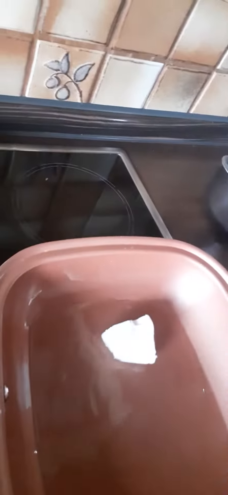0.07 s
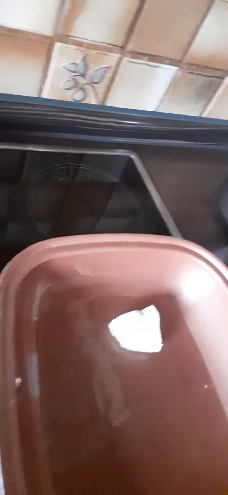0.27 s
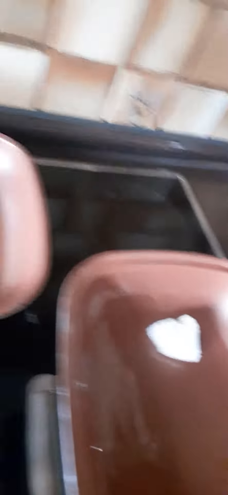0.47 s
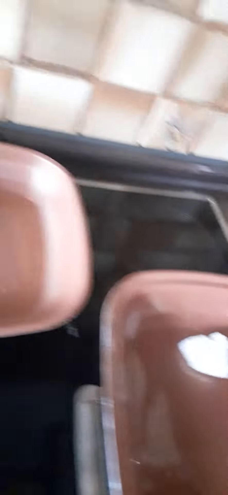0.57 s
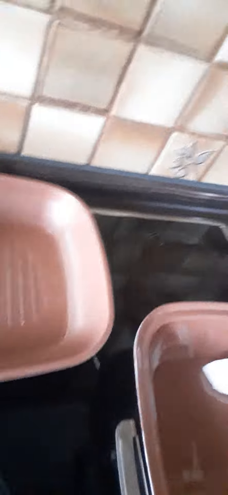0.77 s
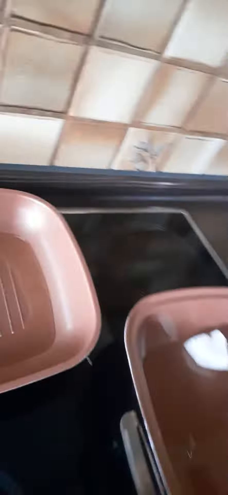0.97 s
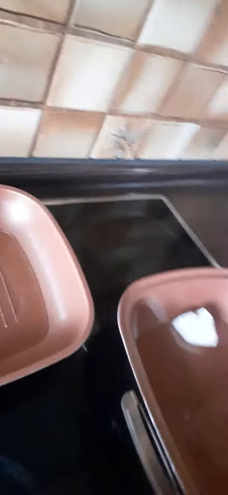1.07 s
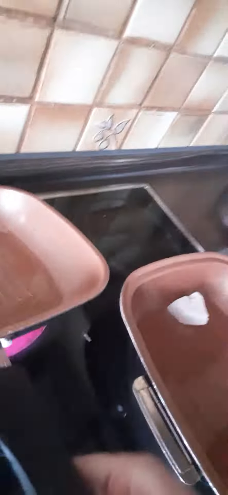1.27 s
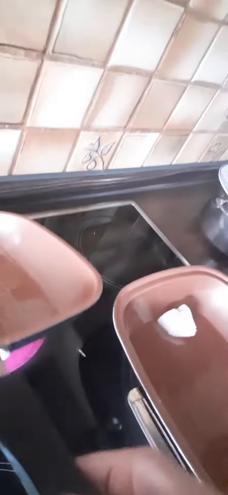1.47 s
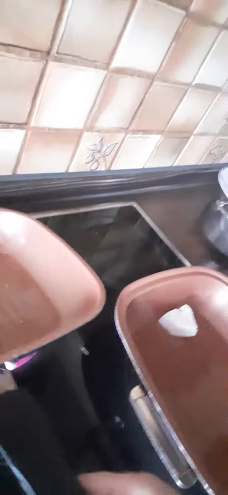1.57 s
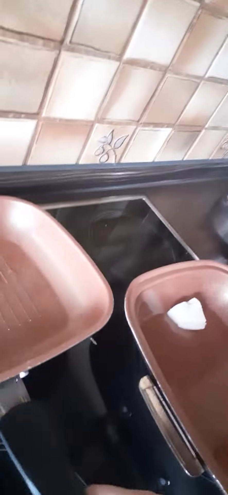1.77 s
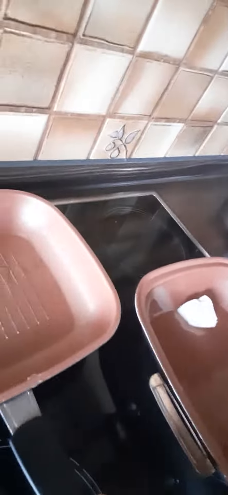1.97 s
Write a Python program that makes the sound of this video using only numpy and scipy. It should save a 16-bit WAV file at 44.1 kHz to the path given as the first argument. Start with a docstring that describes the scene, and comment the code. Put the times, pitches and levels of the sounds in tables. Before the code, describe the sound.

Loud close clank of a metal pan set on a glass hob, then softer bumps and knocks

```python
"""A metal frying pan clanks down on a glass-ceramic hob close to the microphone and rocks to rest.
A soft bump and a duller double knock follow as pans are handled, with faint scrapes, rustles and hiss between.
Each blow is a filtered contact pulse with a rattle and the answer of a small tiled kitchen; pan and hob ring
as decaying modes. Scrapes are resonant noise, rustles and hiss coloured noise, over low mains hum and room air."""
import sys
import numpy as np
from scipy import signal
from scipy.fft import rfft, irfft, next_fast_len
from scipy.io import wavfile
from scipy.ndimage import map_coordinates

SR = 44100
rng = np.random.default_rng(int(sys.argv[2]) if len(sys.argv) > 2 else 0)


def log_audio(samples):
    """Write samples as a 16-bit WAV file to the path given in sys.argv[1]."""
    # one column per channel
    frames = np.atleast_2d(samples).T
    # limit to full scale, then quantise
    limited = np.clip(frames, -1, 1)
    pcm = np.round(limited * 32767).astype(np.int16)
    wavfile.write(sys.argv[1], SR, pcm)


N = 88729  # samples, about two seconds

# How alike the two ports of the microphone hear a sound.
# Each row: frequency in Hz, left-right likeness (1 = the same, 0 = unrelated).
LIKENESS = [(60, 1), (140, .85), (300, 0.48), (560, 0.67), (1100, 0.029), (3000, 0.077), (15000, 0)]
# Colour of the fine sliding hiss and of the tick. Each row: frequency in Hz, relative level in dB.
HISS_COLOUR = [(1000, -22.5), (2500, -13), (4000, -7.5), (6000, -5.5), (9000, -3), (12500, 4),
               (15500, -2.5)]


def amp(db):
    """Decibels to gain."""
    return 10 ** (np.asarray(db) / 20)


def unit(x):
    """Scale to rms 1."""
    return x / np.sqrt(np.mean(x ** 2) + 1e-20)


def along(points, hz):
    """Read a curve of (Hz, value) points on a log frequency axis."""
    point_hz, values = np.transpose(points)
    return np.interp(np.log(hz + 1), np.log(point_hz + 1), values)


def filtered(x, response):
    """Multiply the spectrum of x by a response of frequency."""
    size = x.shape[-1]
    padded = next_fast_len(size + SR // 4)
    hz = np.fft.rfftfreq(padded, 1 / SR)
    return irfft(rfft(x, padded) * response(hz), padded)[..., :size]


def add(out, start_s, x):
    """Mix x into out from start_s, cut at the end of the scene."""
    i = int(round(start_s * SR))
    out[:, i:i + x.shape[1]] += x[:, :N - i]


def port_angle(hz):
    """Angle whose cosine is the left-right likeness at each frequency."""
    return np.arccos(np.clip(along(LIKENESS, hz), -1, 1))


def diffuse(size):
    """White stereo noise, alike in the bass and nearly unrelated in the treble."""
    def mid_side_gains(hz):
        turn = port_angle(hz) / 2
        return np.array([np.cos(turn), np.sin(turn)])

    mid, side = filtered(rng.standard_normal((2, size)), mid_side_gains)
    return np.array([mid + side, mid - side])


def rush(colour):
    """Coloured stereo noise of rms 1."""
    return unit(filtered(diffuse(N), lambda hz: amp(along(colour, hz))))


def softness(hz, cut_hz):
    """A softer contact passes less treble: a second-order roll-off above cut_hz."""
    return 1 / np.sqrt(1 + (hz / cut_hz) ** 4)


def room_tone():
    """Steady mains hum of an appliance, as sine lines, over coloured noise for quiet air."""
    # Mains lines. Each row: frequency in Hz, rms level in dB before the stereo lean.
    hum_lines = [(100.4, -67), (150.6, -71.5), (350, -75), (400.5, -76)]
    # Colour of the room's air. Each row: frequency in Hz, relative level in dB.
    air_colour = [(25, -24), (70, 2), (130, 0.5), (230, -3), (370, -1), (700, -5.5), (1400, -13.5),
                  (2500, -29.5), (6000, -32.5), (9500, -32.5), (13000, -25), (15500, -33)]
    air_db = -66.5
    t = np.arange(N) / SR
    hum = 0
    for hz, db in hum_lines:
        hum = hum + np.sqrt(2) * amp(db) * np.sin(2 * np.pi * (hz * t + rng.random()))
    return hum + amp(air_db) * rush(air_colour)


def rubbing():
    """Friction as coloured noise: short rustles swell and fade, and a fine sliding hiss comes and goes."""
    # Rustles of handling. Each row: time of the peak in seconds, rise in seconds, fall in seconds,
    # peak level in dB before the stereo lean.
    rustles = [(0.506, .035, 0.079, -67), (1.164, 0.038, 0.16, -66), (1.335, 0.05, 0.051, -54),
               (1.60, 0.038, 0.1, -72), (1.85, 0.055, 0.17, -87)]
    # Colour of the rustles. Each row: frequency in Hz, relative level in dB.
    rustle_colour = [(300, 3.5), (900, 3.5), (2000, 1.5), (2500, -1), (3300, 0), (4400, 2), (6800, -4.5),
                     (8500, -1), (12000, -5), (15500, -8)]
    # Course of the hiss. Each row: time in seconds, level in dB before the stereo lean.
    slide_levels = [(.74, -91), (.84, -74), (.875, -68.5), (1.06, -67.5), (1.135, -64), (1.21, -73.5),
                    (1.29, -81.5), (1.33, -80), (1.39, -64.5), (1.52, -76), (1.7, -96.5)]
    t = np.arange(N) / SR
    swells = np.zeros(N)
    for peak_s, rise_s, fall_s, db in rustles:
        rise = ((t - peak_s) / rise_s) ** 2
        fall = (t - peak_s) / fall_s
        swells += amp(db) * np.exp(-np.where(t < peak_s, rise, fall))
    slide = amp(np.interp(t, *np.transpose(slide_levels)))
    return swells * rush(rustle_colour) + slide * rush(HISS_COLOUR)


def scraping():
    """Uneven friction of the pan base on the glass sounds one resonance in each stroke."""
    # Scrapes. Each row: start in seconds, end in seconds, level in dB before the stroke's fades and the
    # stereo lean, resonance in Hz, sharpness Q.
    scrapes = [(0.455, 0.866, -74, 1660, 2.9), (0.531, 0.646, -62, 876, 13), (0.55, 0.867, -68, 664, 4.6),
               (1.141, 1.187, -62, 922, 9), (1.546, 1.953, -74, 1980, 4.3), (1.614, 1.986, -70.5, 1396, 12),
               (1.72, 2.027, -85, 2815, 57), (1.55, 1.97, -75, 617, 3)]
    fade_s, cut_hz = 0.088, 830
    rough_db, grip_rate = 2, 40  # unevenness of the grip in dB, its random points per second
    t = np.arange(N) / SR
    out = np.zeros((2, N))
    for start_s, end_s, db, centre_hz, q in scrapes:
        def body(hz):
            resonance = 1j * hz / (centre_hz ** 2 - hz ** 2 + 1j * hz * centre_hz / q)
            return softness(hz, cut_hz) * resonance

        grip = map_coordinates(rng.standard_normal(512), [t * grip_rate], mode="wrap")
        friction = diffuse(N) * amp(rough_db * grip)
        # each fade is centred on the start or end time
        stroke = np.clip(np.minimum(t - start_s, end_s - t) / fade_s + .5, 0, 1)
        out += amp(db) * stroke * unit(filtered(friction, body))
    return out


def contact_pulse(colour, cut_hz, size=4096):
    """The causal minimum-phase pulse of one contact, built by folding its cepstrum."""
    hz = np.fft.rfftfreq(size, 1 / SR)
    gain = unit(amp(along(colour, hz))) * softness(hz, cut_hz)
    cepstrum = irfft(np.log(np.maximum(gain, 1e-6)))
    cepstrum[1:size // 2] *= 2
    cepstrum[size // 2 + 1:] = 0
    return irfft(np.exp(rfft(cepstrum)))


def energy_one(x):
    """Scale a one-second stereo sound to a mean energy of 1 per port."""
    return unit(x) / np.sqrt(SR)


def kitchen_tail():
    """Reverberation of the small tiled kitchen: noise dying at its own rate in each frequency band."""
    # Each row: frequency in Hz, time to fall 60 dB in seconds.
    kitchen_decay = [(60, 0.64), (150, 0.43), (400, 0.26), (1000, 0.24), (3000, 0.31), (6000, .28),
                     (14000, .23)]
    rise_s = .005
    t = np.arange(SR) / SR
    hz, s, bands = signal.stft(diffuse(SR), SR, nperseg=256)
    decay = amp(-60 * s / along(kitchen_decay, hz)[:, None])
    tail = signal.istft(bands * decay, SR, nperseg=256)[1][:, :SR]
    return tail * (1 - np.exp(-t / rise_s))


def blow(colour, cut_hz, push_db, room_db, rattle_t60=0.029):
    """A contact pulse sent through a first push, a dense short rattle of the plates and the kitchen."""
    rattle_db = -1
    push_cut_hz = 2900  # the first push carries little treble
    port_lag_s = 0.00039  # the left port leads
    t = np.arange(SR) / SR
    path = amp(room_db) * energy_one(kitchen_tail())
    path += amp(rattle_db) * energy_one(diffuse(SR) * amp(-60 * t / rattle_t60))
    low_pass = np.exp(-2 * np.pi * push_cut_hz * t) * (1 - np.exp(-2 * np.pi * push_cut_hz / SR))
    push = amp(push_db) * low_pass
    path += np.array([push, np.roll(push, int(port_lag_s * SR))])
    return signal.fftconvolve(path, contact_pulse(colour, cut_hz)[None], axes=1)[:, :SR]


def ring(modes, cut_hz, scatter_db=1.5, attack_s=0.0007):
    """Decaying, beating pairs of modes; the higher ones reach the two ports out of step."""
    split_hz, twin_db = 11, -12  # typical spacing of a mode's close twin, and the twin's level
    t = np.arange(SR * 3 // 4) / SR
    out = np.zeros((2, SR))
    draws = rng.standard_normal((len(modes), 4))
    for (hz, db, t60), (size, phase, side, twin) in zip(modes, draws):
        apart = np.sign(side) * port_angle(hz) * np.array([[.5], [-.5]])
        mode = np.exp(2j * np.pi * (hz * t + phase))
        beating = 1 + amp(twin_db) * np.exp(2j * np.pi * twin * (split_hz * t + 1))
        fade = amp(db + scatter_db * size - 60 * t / t60) * (1 - np.exp(-t / attack_s))
        out[:, :len(t)] += softness(hz, cut_hz) * (fade * mode * beating * np.exp(1j * apart)).imag
    return out


def pan_handling():
    """Cushioned bumps, a tick, then a damped knock that bounces on the hob and makes it ring."""
    # Cushioned bumps. Each row: start in seconds, relative level in dB, contact cut-off in Hz.
    bumps = [(.3620, -9.5, 301), (0.398, -4, 102), (0.451, -0.5, 1725), (.4590, -1, 380), (0.535, -16, 140),
             (1.073, -19.5, 300)]
    # Colour of the bumps. Each row: frequency in Hz, relative level in dB.
    bump_colour = [(30, -30), (100, -0.5), (150, 1), (260, 4), (500, 0.5), (750, -5.5), (1100, -6),
                   (1500, -17), (1900, -17), (2400, -33), (8000, -58)]
    # Duller knocks of a handled pan. Each row: start in seconds, relative level in dB, contact cut-off in Hz.
    knocks = [(1.2536, 0, 14000), (1.2813, -1.5, 1540), (1.3290, -12.5, 9000), (1.366, -7, 148.4),
              (1.397, -14, 460)]
    # Colour of the knocks. Each row: frequency in Hz, relative level in dB.
    knock_colour = [(25, -56), (55, -6.5), (140, -5), (200, -2.5), (320, 2.5), (720, -9), (950, 6.5),
                    (1450, 0), (2200, -5), (3500, -16), (7000, -25), (15500, -27)]
    # Modes of hob and worktop. Each row: frequency in Hz, relative level in dB, time to fall 60 dB in seconds.
    hob_modes = [(147.7, -8, 0.46), (321.8, 4.5, .33), (465, -3.5, 0.284), (990, -1, 0.24), (1070, -10, .2),
                 (1437, 1, 0.19)]
    bump_db, tick_db, knock_db, hob_db = -14, -38.5, -5, -40
    tick_s = .866
    out = np.zeros((2, N))
    for start_s, db, cut_hz in bumps:
        thud = blow(bump_colour, cut_hz, push_db=-5, room_db=-4.5, rattle_t60=0.055)
        add(out, start_s, amp(bump_db + db) * thud)
    add(out, tick_s, amp(tick_db) * blow(HISS_COLOUR, cut_hz=15000, push_db=-2, room_db=1.5))
    for start_s, db, cut_hz in knocks:
        knock = blow(knock_colour, cut_hz, push_db=-9.5, room_db=-2.5, rattle_t60=0.048)
        knock += amp(hob_db) * ring(hob_modes, cut_hz)
        add(out, start_s, amp(knock_db + db) * knock)
    return out


def upper_modes(count=36):
    """The pan's crowd of treble modes, at scattered levels that tend to fall toward the top."""
    low_hz, high_hz, t60 = 2937, 13380, 0.17  # t60 in seconds
    low_db, db_per_octave, spread_db = -20.5, -6, 8.5
    hz = low_hz + (high_hz - low_hz) * (np.arange(count) + rng.random(count)) / count
    db = low_db + db_per_octave * np.log2(hz / low_hz) + spread_db * rng.standard_normal(count)
    return [(mode_hz, mode_db, t60) for mode_hz, mode_db in zip(hz, db)]


def pan_landing():
    """The pan hits the glass with one edge, then flat, and rocks to rest; the hardest contact wakes upper modes."""
    # Contacts of pan and glass. Each row: start in seconds, relative level in dB, contact cut-off in Hz.
    clanks = [(0.064, -1.5, 2010), (0.0667, -0.5, 14000), (.0890, -12.5, 6910), (.1020, -10.5, 700),
              (0.1667, -17, 1760), (.1740, -14, 300), (0.2239, -21.5, 680), (0.226, -35.5, 3370)]
    # Colour of the pan on the glass. Each row: frequency in Hz, relative level in dB.
    clank_colour = [(25, -40), (50, -13), (125, -3.5), (175, -10.5), (250, -3.5), (450, -8.5), (700, -2),
                    (1050, -3.5), (1550, -8), (2300, -10), (2560, -11), (2760, -6.5), (3200, -13),
                    (5200, -11.5), (7500, -18.5), (8500, -13), (9600, -23.5), (11200, -15.5),
                    (15500, -35.5)]
    # Modes of the pan. Each row: frequency in Hz, relative level in dB, time to fall 60 dB in seconds.
    pan_modes = [(119, -19, .65), (146, -19, .6), (240, -13, .42), (311, -17, .33), (406, -11, .28),
                 (520, -8, .22), (635, -6, .22), (908, -4, .22), (1000, -3, .2), (1270, -9, .26),
                 (1822, -13, .25), (1978, -9, .25), (2690, -7, .22), (2770, -6, .26), (2811, -3, .27),
                 (2870, -13, .3), (3897, -7, .24), (4033, -12, .22), (4580, -12, .2), (5152, -12, .2),
                 (5238, -10, .2)]
    clank_db, ring_db = 11, -33.5
    out = np.zeros((2, N))
    for start_s, db, cut_hz in clanks:
        clank = blow(clank_colour, cut_hz, push_db=-6, room_db=-3.0, rattle_t60=0.064)
        clank += amp(ring_db) * ring(pan_modes, cut_hz)
        add(out, start_s, amp(db) * clank)
    # the hardest contact has the highest cut-off
    start_s, db, cut_hz = max(clanks, key=lambda row: row[2])
    add(out, start_s, amp(db + ring_db) * ring(upper_modes(), cut_hz))
    return amp(clank_db) * out


def scene():
    """Everything heard above the hob; the quiet sounds lean to the left."""
    left_db = 0.86  # left over right
    quiet = scraping() + rubbing() + room_tone()
    lean = amp(left_db * np.array([[.5], [-.5]]))
    return pan_landing() + pan_handling() + quiet * lean


def record(dry):
    """The recorder keeps nothing above its band limit, reached by a ramp 200 Hz wide."""
    top_hz = 15800  # middle of the ramp
    return filtered(dry, lambda hz: np.clip((top_hz - hz) / 200 + .5, 0, 1))


dry = scene()
out = record(dry)
log_audio(out)
```